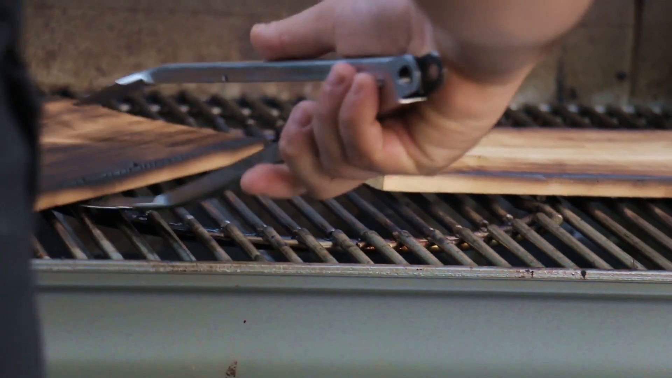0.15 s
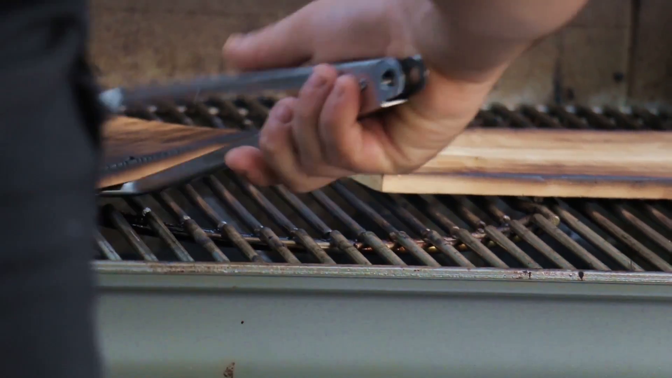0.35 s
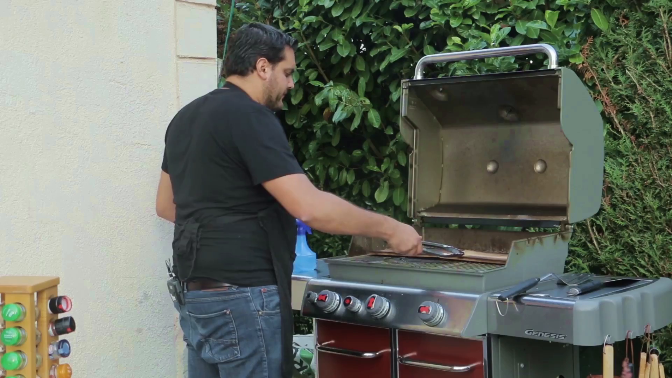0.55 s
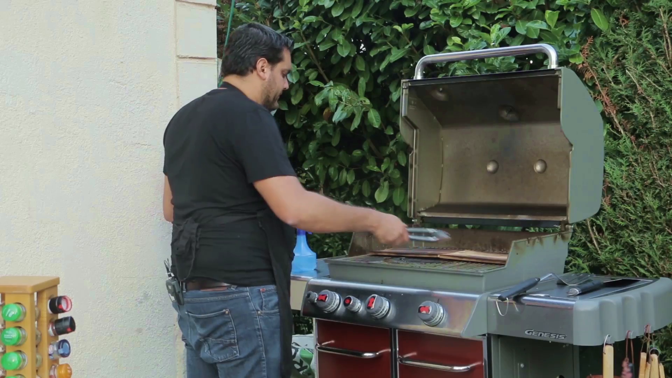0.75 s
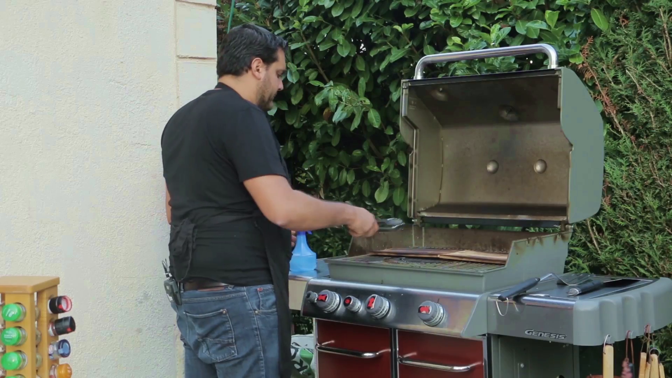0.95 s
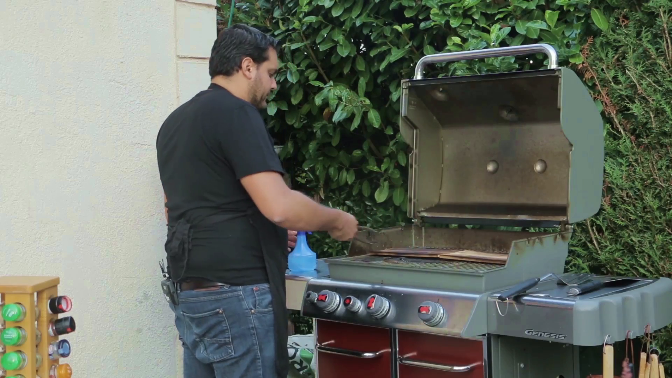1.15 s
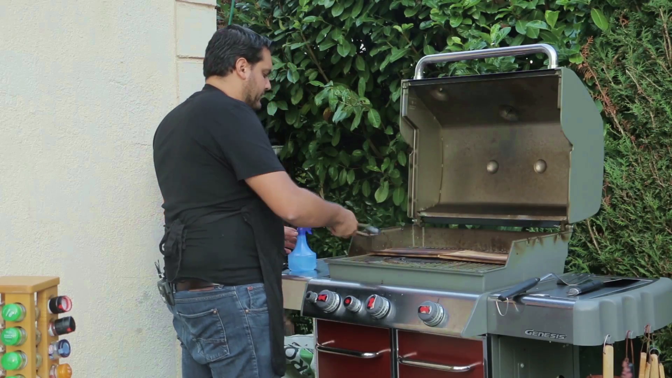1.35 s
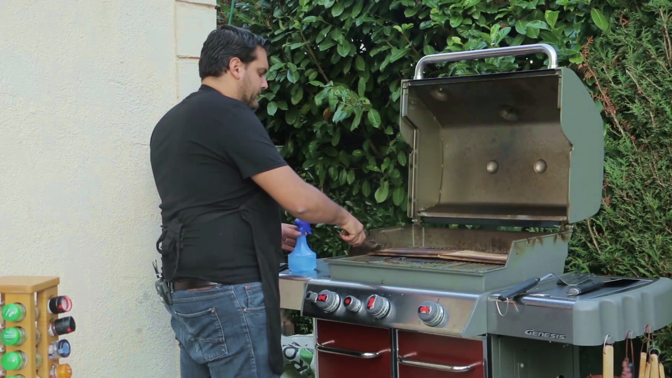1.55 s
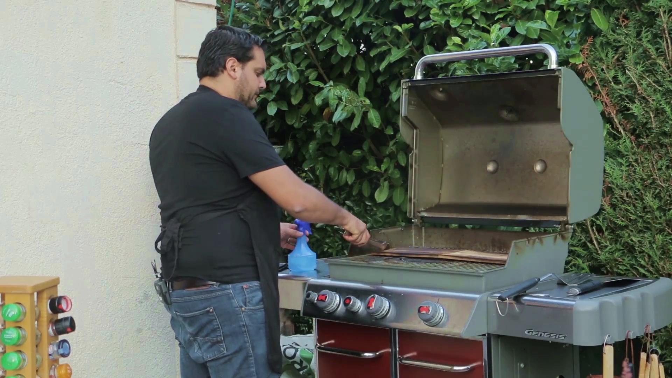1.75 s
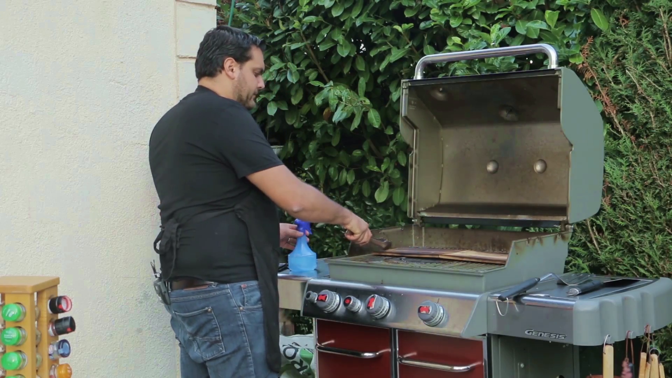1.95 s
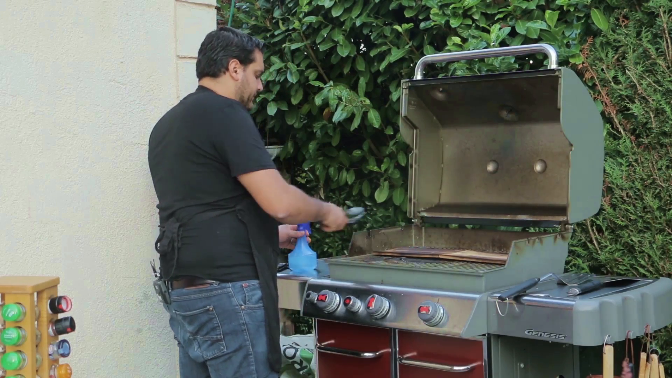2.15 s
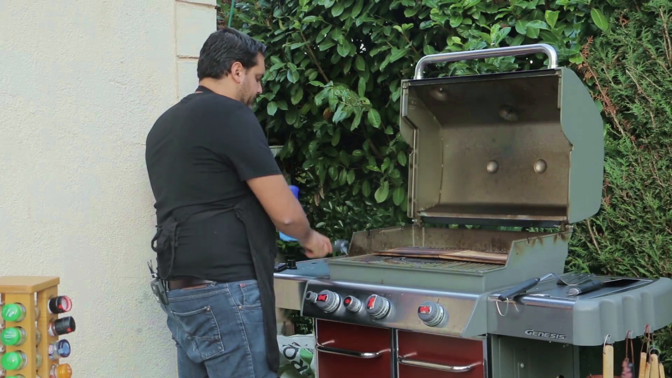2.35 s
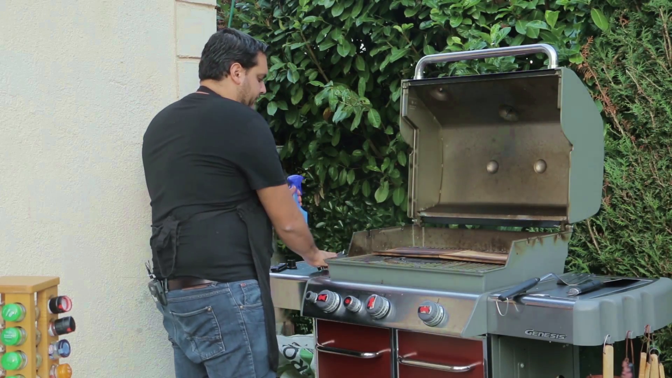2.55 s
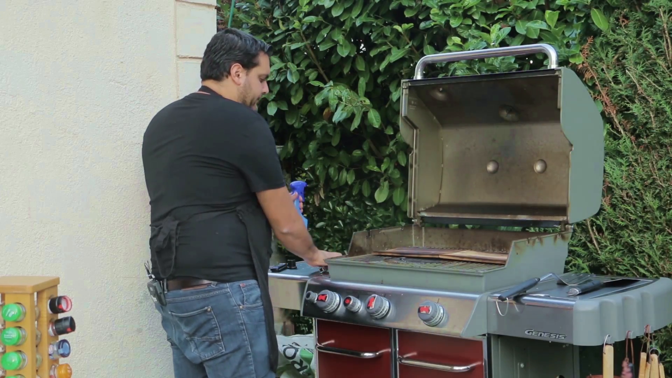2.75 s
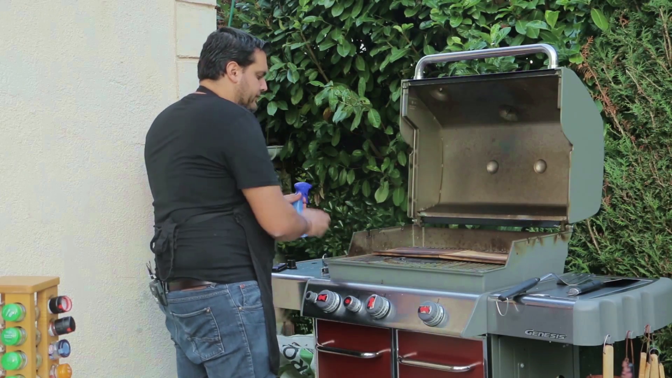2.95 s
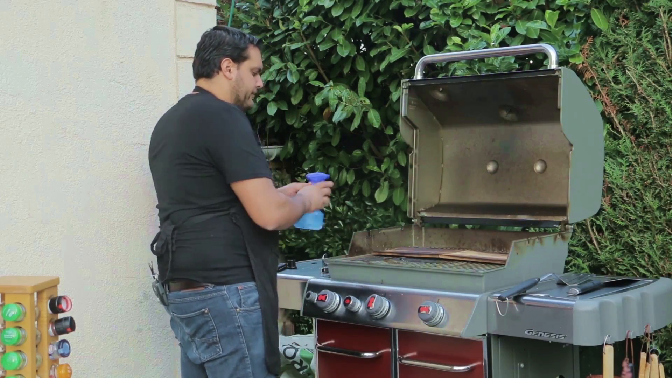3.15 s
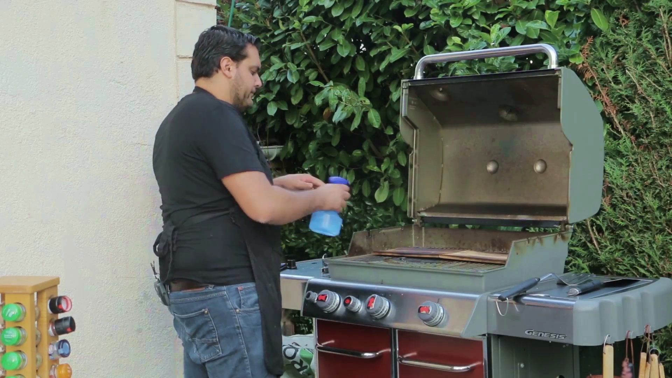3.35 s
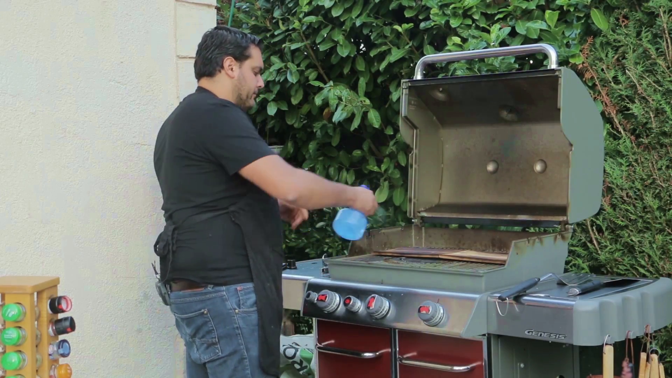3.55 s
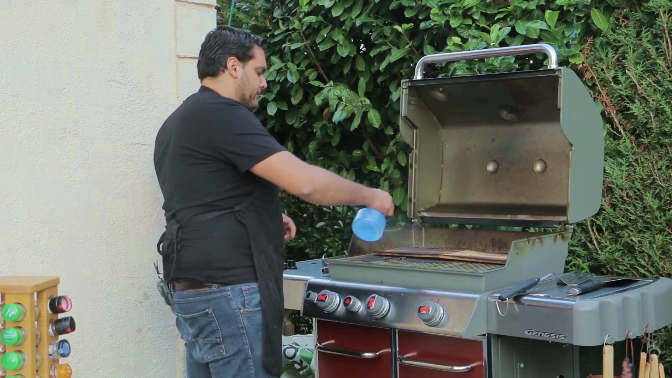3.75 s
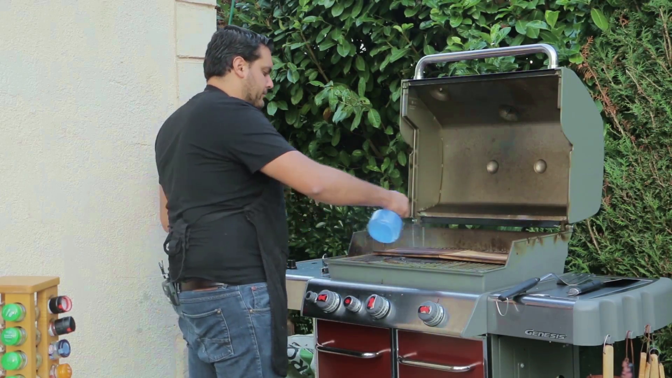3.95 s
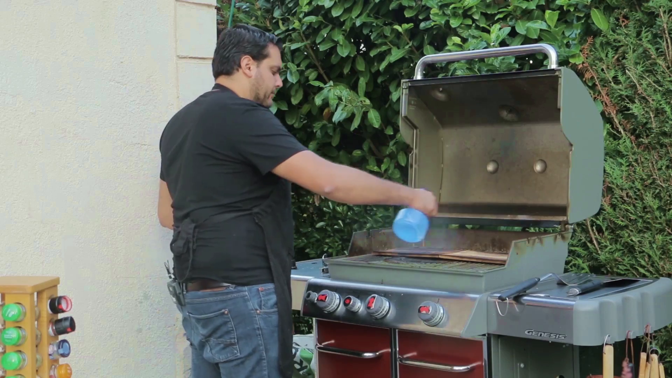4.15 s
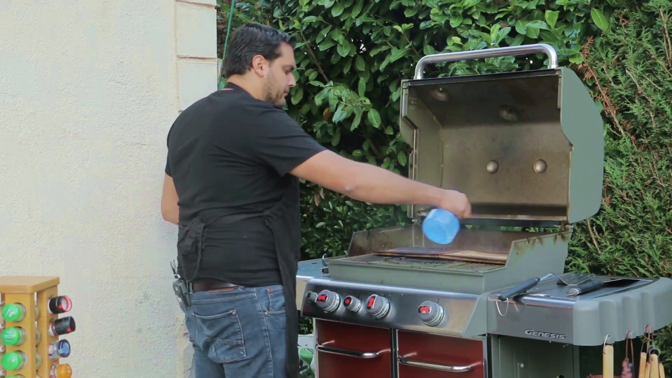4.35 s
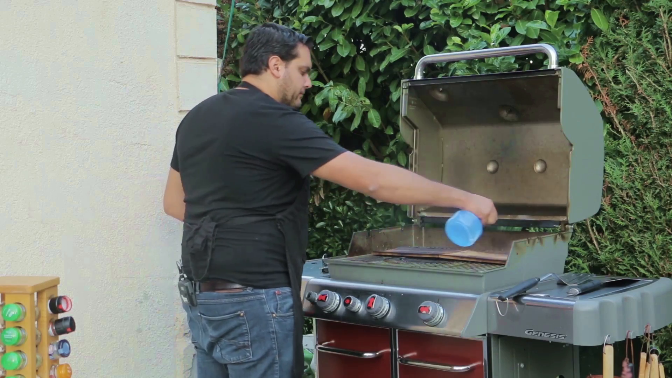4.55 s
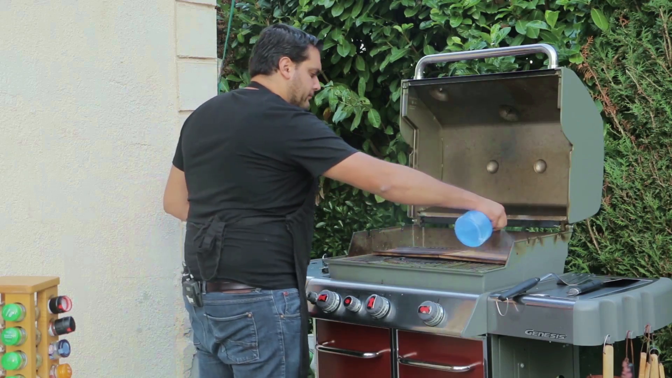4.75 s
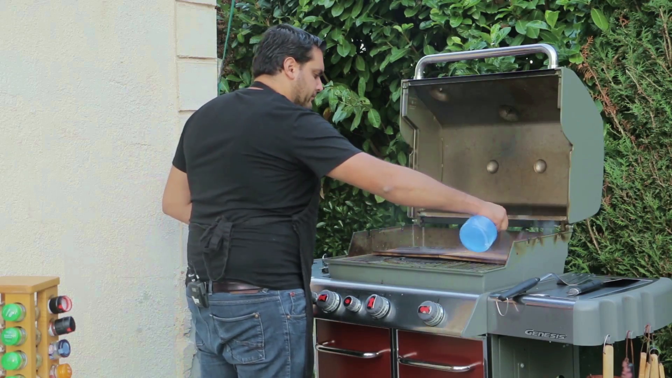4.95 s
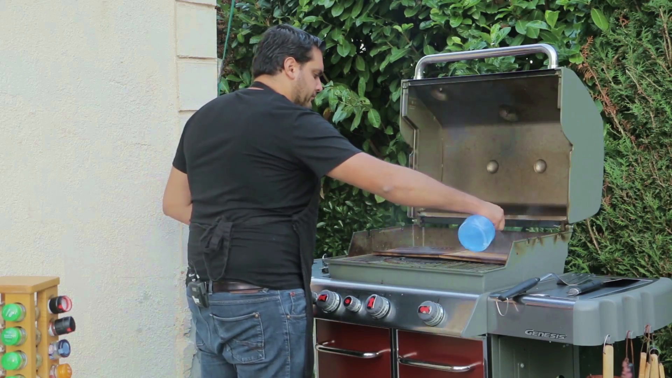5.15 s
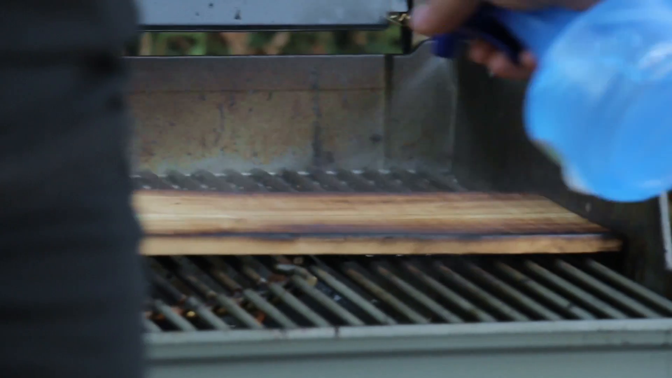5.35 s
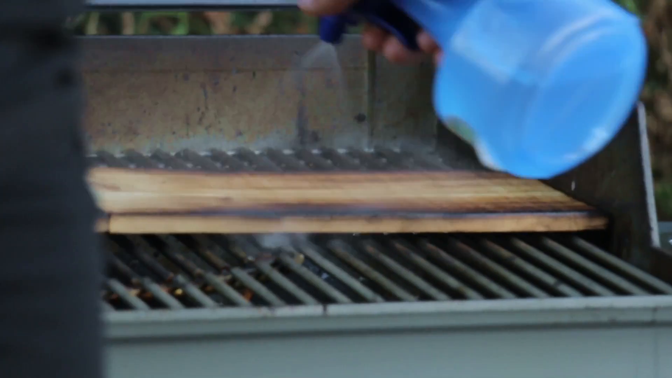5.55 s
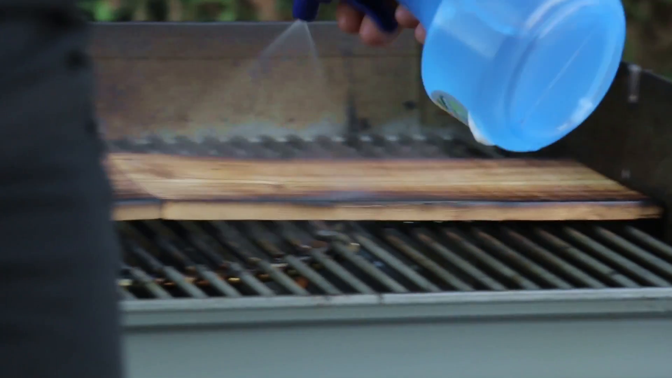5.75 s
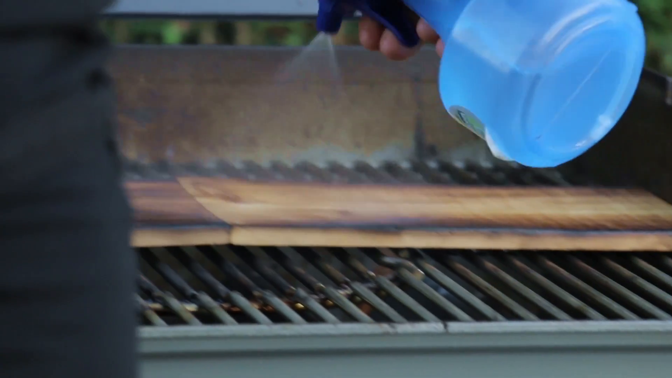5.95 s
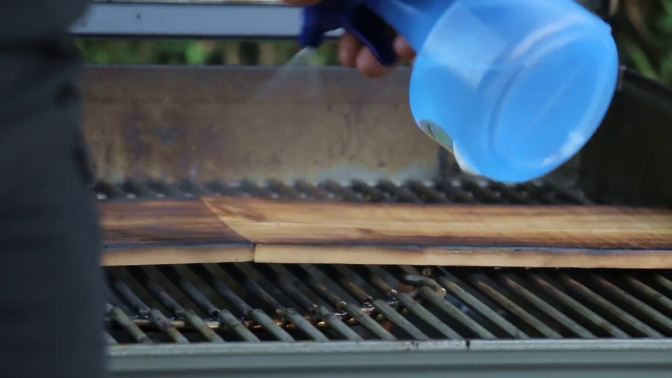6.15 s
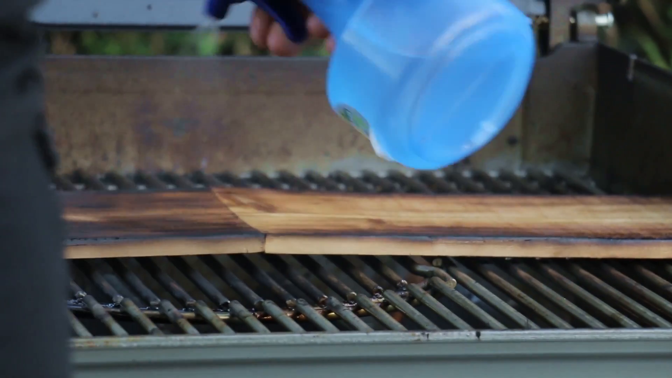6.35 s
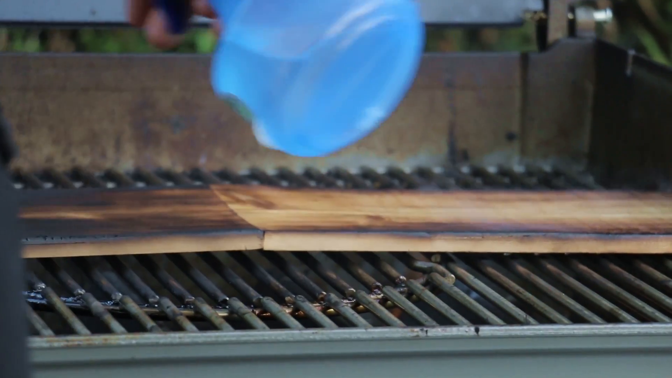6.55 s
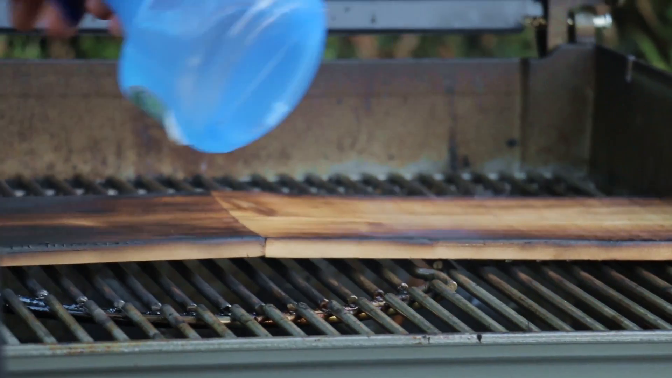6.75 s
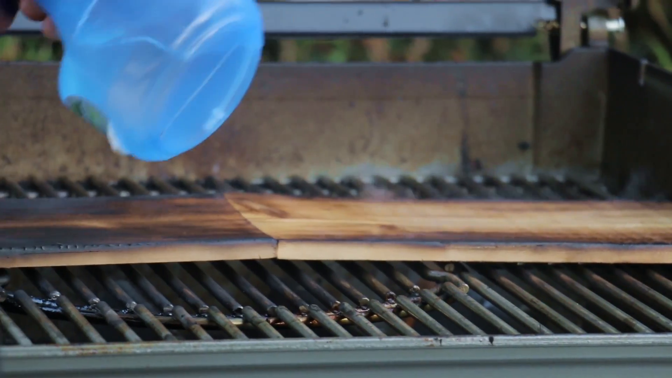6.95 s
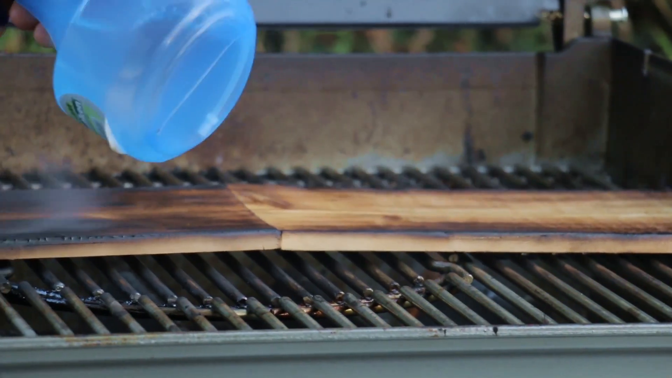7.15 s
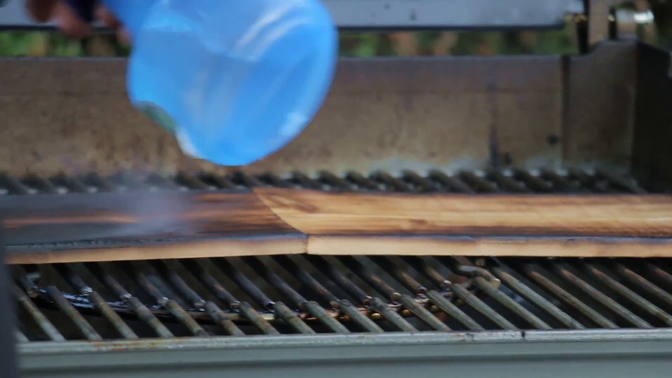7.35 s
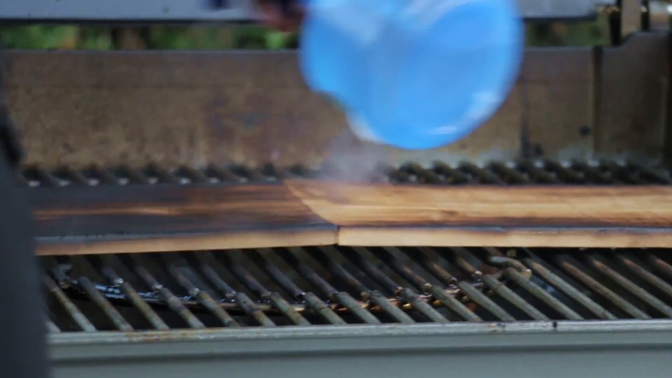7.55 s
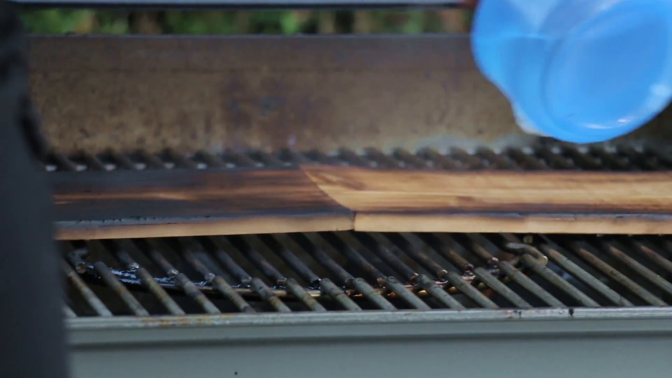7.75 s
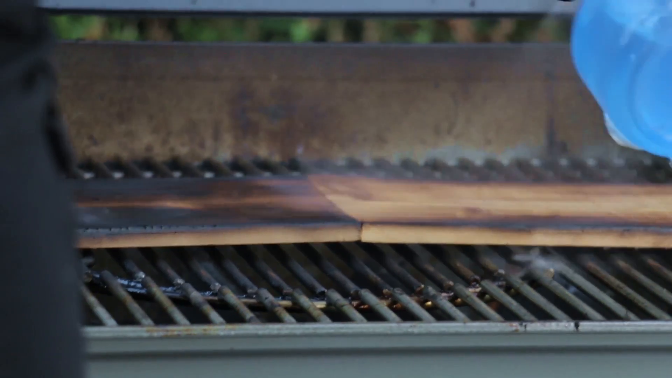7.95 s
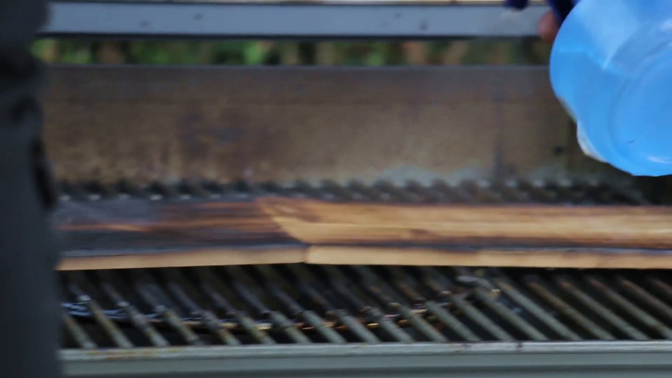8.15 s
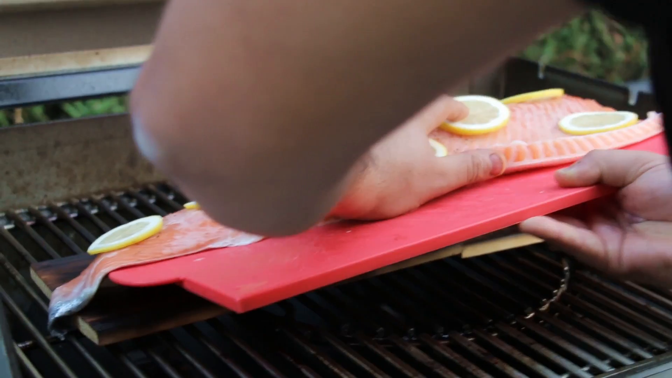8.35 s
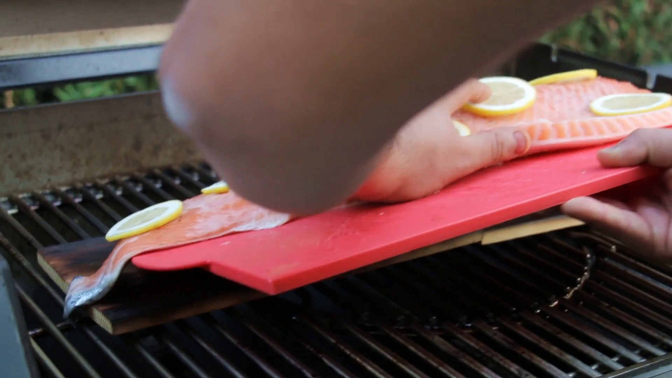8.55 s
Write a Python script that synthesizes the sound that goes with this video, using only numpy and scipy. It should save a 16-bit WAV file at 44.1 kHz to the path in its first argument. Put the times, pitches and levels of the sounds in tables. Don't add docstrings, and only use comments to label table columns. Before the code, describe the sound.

Close to a garden grill, wooden planks and metal tongs thump, scrape and rattle on loose bars, with a brief hinge squeal and a tong clap. Heavier clanks boom through the firebox. After small clicks, a trigger bottle squirts again and again, its pump snapping and juddering while water hisses and sizzles on hot wood. Faint burner and leafy air lie beneath; the sound fades out.

```python
import sys
import numpy as np
from scipy import signal
from scipy.fft import rfft, irfft, next_fast_len
from scipy.io import wavfile
from scipy.ndimage import uniform_filter1d, map_coordinates

SR = 44100
rng = np.random.default_rng(int(sys.argv[2]) if len(sys.argv) > 2 else 0)


def materialize(psi):
    bounded = np.clip(np.atleast_2d(psi).T, -1, 1)
    quanta = np.round(bounded * 32767).astype(np.int16)
    wavfile.write(sys.argv[1], SR, quanta)


def volts(x):
    e = np.asarray(x, float) / 20
    return 10 ** e


N = 379319
T = np.arange(N) / SR
CUT_S = 8.587


def unit(x):
    return x / np.sqrt(np.mean(x ** 2) + 1e-20)


def curves(rows):
    s, *cols = np.transpose(rows)
    return [np.interp(T, s, c, left=-150, right=-150) for c in cols]


def wobble(rate_hz):
    knots = rng.standard_normal(int(N * rate_hz / SR) + 4)
    return map_coordinates(knots, [T * rate_hz])


def filtered(x, response):
    m = next_fast_len(N + SR // 2)
    return irfft(rfft(x, m) * response(np.fft.rfftfreq(m, 1 / SR)), m)[:N]


def colour(points):
    f, db = np.transpose(points)
    return lambda hz: volts(np.interp(np.log(hz + 1), np.log(f), db, left=-120, right=-120))


def resonances(peaks):
    def response(f):
        total = 0
        for k, (hz, width_hz, db) in enumerate(peaks):
            damping = 1j * f * width_hz
            total = total + (-1) ** k * volts(db) * damping / (hz * hz - f * f + damping)
        return total
    return response


def noise(response, grain_db=0., rate_hz=600):
    grain = volts(grain_db * wobble(rate_hz))
    return unit(filtered(rng.standard_normal(N) * grain, response))


def streaked(response, streak_db):
    z = signal.stft(rng.standard_normal(N), nperseg=1024)[2]
    field = uniform_filter1d(rng.standard_normal(z.shape), size=14, axis=1)
    patchy = signal.istft(z * volts(streak_db * unit(field)), nperseg=1024)[1][:N]
    return unit(filtered(patchy, response))


def fading(s, db, t60, rise):
    t = np.maximum(T - s, 0)
    return volts(db - 60 * t / t60) * (1 - np.exp(-t / rise))


def ringing(modes, s, db, keep, loose, rise=.001):
    t = T[:SR]
    out = np.zeros(N + SR)
    ring = np.zeros(SR)
    for hz, level_db, t60_s in modes:
        strength, detune, *knots = rng.standard_normal(152)
        waver = 1 + loose * np.interp(t, np.arange(150) / 150, knots)
        decay = volts(db + level_db + 2.4 * strength - 60 * t / (keep * t60_s))
        ring += decay * waver * np.sin(2 * np.pi * hz * (1 + .002 * detune) * t)
    out[round(s * SR):][:SR] = ring * (1 - np.exp(-t / rise))
    return out[:N]


def garden():
    # start_s, level_db
    bed = [(0, -46.5), (1, -59.5), (1.8, -57.5), (3.4, -55.5), (5.5, -59), (7.9, -57.5), (8.61, -56)]
    # freq_hz, density_db
    air = [(15, -59), (25, -6.5), (130, 0), (330, -0.5), (560, -2), (1600, -16), (8140, -40),
           (16000, -34.5)]
    after_db = -56
    db = np.where(T > CUT_S, after_db, curves(bed)[0])
    gusts_db = 1.4 * wobble(9)
    return volts(db + 3.0 + gusts_db) * noise(colour(air))


def drag():
    # hardest_push_s, swell_s, release_s, rasp_db, rustle_db; swell, release span 20 dB
    slides = [(0.0, .1, 0.53, -46.5, -54), (.3, 0.42, 0.064, -51, -43), (.82, 0.52, 0.31, -61, -72),
              (1.15, .3, .5, -73, -80), (1.47, .4, 0.62, -65, -66), (1.77, .55, .4, -68, -82),
              (2.26, 0.39, 0.47, -61.5, -57), (2.86, 0.076, 0.2, -43.5, -45), (2.94, 0.11, .04, -35, -35.5),
              (2.99, .1, 0.088, -33.5, -55), (3.37, 0.22, 1, -64.5, -63.5), (3.72, .3, .03, -57, -52)]
    rasp_power = np.full(N, volts(-81.5) ** 2)
    rustle_power = np.full(N, volts(-73.5) ** 2)
    for s, swell_s, release_s, rasp_db, rustle_db in slides:
        push_db = -20 * np.maximum((s - T) / swell_s, (T - s) / release_s)
        rasp_power += volts(rasp_db + push_db) ** 2
        rustle_power += volts(rustle_db + push_db) ** 2
    rasp_shape = colour([(900, -14), (2000, -2.5), (5000, -4.5), (8500, -10.5), (10000, -31.0)])
    rustle_shape = colour([(7000, -36), (9000, -0.5), (12000, 0.5), (15800, -7)])
    rasp = np.sqrt(rasp_power) * volts(-2.0) * noise(rasp_shape, 1.8, 250)
    return rasp + np.sqrt(rustle_power) * volts(-6.0) * noise(rustle_shape, 3.6, 270)


def brushes():
    # start_s, length_s, level_db, low_hz, high_hz
    strokes = [(.795, .04, -56, 4000, 6500), (0.998, .032, -58.5, 1200, 3350), (1.0, 0.15, -69, 5300, 6600),
               (1.263, .1, -65, 3300, 3900), (1.33, .14, -71, 3500, 4800), (3.4, 0.099, -67, 4300, 5600),
               (0.838, 0.08, -65, 4200, 6900), (1.125, .07, -74, 3100, 3500),
               (1.19, 0.0071, -64, 500, 2000), (1.69, .025, -45, 4300, 7900), (2.865, .06, -45, 4500, 7600),
               (3.265, .045, -60, 3000, 15000), (3.367, .035, -58.5, 3000, 6500),
               (3.617, .035, -47.5, 2500, 15000)]
    out = np.zeros(N)
    for s, length_s, db, low_hz, high_hz in strokes:
        u = np.clip((T - s) / length_s, 0, 1)
        edges = np.clip(np.minimum(8 * u, 4 * (1 - u)), 0, 1)
        band = colour([(0.86 * low_hz, -30), (low_hz, 0), (0.98 * high_hz, 0)])
        out += volts(db - 6.2 * u) * edges * noise(band, 2.2, 300)
    return out


def smear(pitch_hz, rate_hz):
    strength = (0.95 + wobble(rate_hz)) * volts(2.0 * wobble(30))
    return strength * np.sin(2 * np.pi * np.cumsum(pitch_hz) / SR)


def hinge():
    # start_s, pitch_hz, level_db
    squeak = [(1.255, 3590, -74), (1.278, 3630, -67), (1.288, 4000, -63), (1.36, 3970, -65),
              (1.42, 4200, -61), (1.5, 4130, -65), (1.58, 4290, -63), (1.625, 4200, -74)]
    # start_s, length_s, pitch_hz, level_db, glide_hz_per_s
    chirps = [(1.0, .1, 5500, -69, 0), (1.46, .17, 11800, -71, 0), (.56, .08, 10600, -73, 0),
              (3.125, .04, 14500, -72, 25000), (3.175, .03, 15200, -70, -50000),
              (3.2, .025, 12800, -68, -50000)]
    hz = np.interp(T, *np.transpose(squeak)[:2])
    main = smear(hz * (1 + 0.005 * wobble(35)), 250)
    lower = 0.85 * np.clip((1.45 - T) / 0.12, 0, 1) * smear(0.41 * hz + 1950, 450)
    rough = 0.57 * smear(0.97 * hz, 1500)
    out = volts(curves(squeak)[1]) * (main + lower + rough)
    for s, length_s, chirp_hz, db, glide in chirps:
        swell = np.sin(np.pi * np.clip((T - s) / length_s, 0, 1))
        pitch_hz = chirp_hz + glide * np.clip(T - s, 0, length_s)
        out += volts(db) * swell * smear(pitch_hz * (1 + .006 * wobble(44)), 400)
    return out


def ticks():
    # start_s, peak_db, pitch_hz, t60_s
    contacts = [(1.2344, -54, 4860, 0.065), (1.4894, -50, 4020, 0.06), (1.5195, -33, 1810, 0.053),
                (2.319, -34.5, 11500, 0.1), (2.529, -46, 1500, 0.031), (3.545, -44, 7000, 0.04),
                (3.3714, -51, 3500, 0.12), (3.4216, -45, 1630, 0.044), (3.454, -39, 2000, 0.02),
                (3.5877, -38, 5400, 0.038), (3.6244, -31.5, 3270, 0.18), (3.6444, -39, 6680, 0.075),
                (3.6874, -27.5, 3358, 0.075), (8.2894, -34, 2080, 0.066), (8.3976, -31, 10900, 0.06),
                (8.4684, -38, 2020, 0.06)]
    wide = streaked(colour([(900, 3), (2000, 0.5), (8000, -3.0), (15500, -3.5)]), 2.2)
    flutter = 0.99 * wobble(450)
    out = np.zeros(N)
    for s, db, hz, t60 in contacts:
        out += fading(s, db - 11.0, t60, 0.00055) * wide
        out += fading(s, db - 5, 0.35 * t60, .0004) * flutter * np.sin(2 * np.pi * hz * T)
    return out


def notes():
    # start_s, peak_db, pitch_hz, t60_s
    tones = [(1.001, -36, 210, 0.05), (1.625, -28.5, 3390, 0.037), (1.628, -29, 2000, .08),
             (1.8, -37, 1650, 0.056), (1.4, -51, 6800, 0.065), (2.35, -30, 4600, 0.099),
             (2.364, -36, 4000, .05), (2.352, -35, 5260, 0.1), (2.365, -34.5, 2080, 0.07),
             (0.082, -43, 7000, 0.063), (0.094, -41, 11000, .08), (3.861, -31, 2090, 0.046),
             (4.72, -35, 2220, 0.037), (4.91, -37, 1980, 0.02), (5.5, -44, 3470, 0.092),
             (6.346, -41, 1930, 0.039), (6.631, -46, 1300, 0.055)]
    out = np.zeros(N)
    for s, db, hz, t60 in tones:
        t = T - s
        out += fading(s, db, t60, 0.00032) * np.sin(2 * np.pi * hz * t * (1 + 0.13 * t))
    return (1 + .5 * wobble(350)) * out


def blows():
    # start_s, peak_db, thud_db, brightness_db, t60_s
    sudden = [
        (0.4554, -24, -8, -16, 0.38),
        (0.7567, -31.5, 1, -41, 0.32),
        (2.3491, -25.5, -11.5, -7.5, 0.071),
        (2.3627, -31, -25, -2.5, 0.15),
    ]
    blunt = [(0.0034, -39, 7, -32, 0.32), (0.0972, -30, -4, -9, 0.28), (0.2024, -19.5, -9, -16.5, 0.35),
             (0.5104, -33, -2, -18.5, 0.66), (0.7955, -38, 2.5, -22, 0.68), (1.6924, -44, 7, -4, 0.55),
             (1.0006, -47, -4, -25, 0.097), (2.594, -15, -6, -18, 0.48), (2.7212, -17.5, -4, -14.5, 0.58),
             (2.9334, -12, -7, -13.5, 0.41), (2.9594, -22.5, -10.5, -10.5, 0.78)]
    glancing = [(0.044, -36.5, -13, -10.5, 1.0), (0.2897, -36.5, -3.5, -12, 0.85),
                (.222, -29, -1, -29, 0.27), (1.624, -29, -4, -9, 0.32), (3.0238, -19, -16.5, -16, 0.37),
                (2.93, -18.5, 2.5, -20, 0.48)]
    # freq_hz, width_hz, level_db
    plank = [(197, 85, -5), (288, 92, -4), (427, 69, 1), (510, 68, 3), (655, 32, 3.5), (743, 26, -1.5),
             (881, 50, -3), (1090, 19, -5), (1280, 35, -23)]
    firebox = [(121, 20, -13), (220.5, 25, -4), (256, 25, -1), (308, 30, -3.5), (375, 18, -1),
               (411, 19, -3), (464, 27, -2), (559.5, 22, 1), (655, 38, -4), (739, 19, 1), (825, 26, -4),
               (962, 36, -8.5), (1073, 25, -8), (1258, 40, -12)]
    shimmer = [(5230, 200, -12), (6500, 350, -2), (7360, 500, 3), (7900, 300, -2)]
    # freq_hz, level_db, t60_s
    tongs = [(1495, -15, 2.7), (2050, 7, 0.22), (2310, -12.5, 0.97), (2920, -20, 1.4), (3940, -20.5, 0.78),
             (4950, -19, 0.4), (5190, -22, 1), (6700, 5, 0.075), (6500, -28, 1.3), (7280, -19, 0.53),
             (2780, -20.5, 1.4), (7913, -21, .4), (11250, -17, .4), (12250, -18, .35)]
    grate = [(1430, -7.5, 0.29), (1570, -7, 0.11), (2100, -16, 0.22), (2720, -15, 0.22), (3340, -4, 0.55),
             (3840, -2, 0.35), (4500, -15.5, 1.1), (5200, -3.5, 0.18), (6150, -15, 0.28), (7542, -22, 0.38),
             (8300, -31.5, 0.3), (8382, -48, 0.32)]
    loaded = [(514, -5, 0.52), (618, -7, 0.68), (850, -10, 0.64), (1196, -6.5, 1.14), (1785, -6.5, 0.59),
              (2035, -6, 0.4), (2400, -17, 0.33), (2760, -12, 0.48), (3210, -15, 0.52), (3515, -15, 0.37),
              (3830, -17, 0.36), (4540, -25, 1.4), (5070, -11, 0.11), (6330, -16, 0.17)]
    shifted = [(476, -2, 0.58), (570, 1, 0.53), (864, -5, 1), (1035, -9, 0.99), (1774, 3, 0.27),
               (2250, -15, .31), (2760, -17, .4), (3042, -18, .62), (3521, -25, 1.2), (3962, -21, .24),
               (4339, -14, 0.32), (5120, -23, .46), (5297, -22, .31), (5652, -34, 1.2)]
    box = [(251.4, -8, 0.34), (490, -2.5, 0.3), (557, -1.5, 0.43), (728, -5.5, 0.3), (1351, -15, 0.5),
           (1500, -10.5, 0.26), (1857, -16, 0.34), (1992, -16, 0.33), (2200, -28, 0.91),
           (2277, -21.5, 0.42), (2697, -23, 0.53), (2880, -19, 0.47), (3300, -15.5, 0.46),
           (3680, -25.5, 0.31)]
    # freq_hz, density_db
    crash_shape = [(700, -19), (1100, 1), (1700, -0.5), (2400, -6.5), (3500, -27)]
    clang_shape = [(1800, -37), (2600, 0), (4500, -4.5), (6000, -10), (8000, -17.5)]
    sheen_shape = [(4000, -9.5), (6000, -6), (10000, -5), (15500, -9)]

    thud, crash, clang, sheen, ring, knock = np.zeros((6, N))
    kinds = [(sudden, 0.001), (blunt, 0.0031), (glancing, 0.0086)]
    contacts = [(*row, rise) for rows, rise in kinds for row in rows]
    for s, db, thud_db, bright_db, t60, rise in contacts:
        thud += fading(s, db + thud_db - 1.5, 1.24 * t60, 1.9 * rise) ** 2
        crash += fading(s, db - 11, 0.93 * t60, rise) ** 2
        clang += fading(s, db + 0.53 * bright_db - 6, 0.71 * t60, rise) ** 2
        clang += fading(s, db + 0.75 * bright_db - 6.5, 0.018, .0004) ** 2
        sheen += fading(s, db + bright_db - 3.5, 0.48 * t60, rise) ** 2
        sheen += fading(s, db + bright_db + 1.5, 0.084, .0003) ** 2
        knock[round(s * SR)] = volts(db + thud_db + 45.5 - 3500 * rise)
        if 1.5 < s < 1.75:
            ring += ringing(tongs, s, db - 10.5, keep=0.97, loose=.45)
        elif not 2 < s < 2.5:
            ring += ringing(grate, s, db + 0.48 * bright_db - 18.0, keep=0.52, loose=.6)
        if s < .9:
            bars = loaded if s < .7 else shifted
            ring += ringing(bars, s, db - 13.5, keep=0.68, loose=0.55, rise=0.004)
        if s > 2.5:
            ring += ringing(box, s, db + thud_db - 3.5, keep=0.96, loose=0.58, rise=.012)

    lifted = noise(resonances(plank), 1.1, 90)
    dropped = noise(resonances(firebox), 0.87, 90)
    boom = np.sqrt(thud) * np.where(T < 2.2, lifted, dropped)
    wood = filtered(knock, resonances([(538, 140, -0.5), (1950, 330, -10.5)]))
    rattle = np.zeros(N)
    for power, shape in [(crash, crash_shape), (clang, clang_shape), (sheen, sheen_shape)]:
        rattle += np.sqrt(power) * streaked(colour(shape), 4.8)
    tail_gate = np.where(T < 1.62, volts(-2500 * np.clip(T - 1.03, 0, .01)), 1)
    tong_shimmer = fading(1.625, -55, 0.64, .004) * noise(resonances(shimmer), 2.5, 60)
    return tail_gate * (boom + wood + rattle + ring) + tong_shimmer


def bottle(x):
    # freq_hz, width_hz, level_db
    upright = [(386, 210, -3.5), (818, 110, 5)]
    tipped = [(348, 132, 3), (827, 83, 3.5)]
    tipped_s = 6.55
    return np.where(T < tipped_s, filtered(x, resonances(upright)), filtered(x, resonances(tipped)))


def ramp(x):
    return np.sin(np.pi / 2 * np.clip(x, 0, 1)) ** 2


def squeeze(s, length_s):
    attack_s, release_s, build_db = 0.018, 0.049, 6
    drain_db, drain_t60_s = -9, 0.34
    opening = ramp((T - s) / attack_s) * volts(build_db * np.clip((T - s) / length_s - .7, -1, 0))
    hold = ramp((s + length_s - T) / release_s)
    drain = volts(drain_db - 60 * np.maximum(T - s - length_s, 0) / drain_t60_s)
    return opening ** 2 * (hold ** 2 + drain ** 2)


def spray():
    # start_s, squeeze_s, jet_db, pump_db
    pulls = [(3.74, 0.13, -56, -70), (3.89, 0.16, -40, -46), (4.115, 0.049, -38.5, -45),
             (4.3, 0.061, -40, -45), (4.53, 0.058, -36.5, -49), (4.74, 0.14, -43, -55),
             (4.946, 0.14, -36.5, -48.5), (5.155, 0.089, -39, -69), (5.35, 0.057, -41.5, -60),
             (5.555, 0.054, -41.5, -46), (5.77, 0.088, -41, -57), (5.977, 0.063, -38, -46),
             (6.205, 0.057, -38.5, -50), (6.412, 0.07, -39, -46), (6.655, .17, -45.5, -50),
             (6.87, 0.17, -40, -51), (7.09, 0.17, -40.5, -48), (7.3, .16, -39, -44.5),
             (7.51, 0.19, -40, -46), (7.745, 0.08, -41, -45.5)]
    # start_s, level_db
    boiling = [(3.71, -53), (3.75, -39.5), (3.82, -37), (3.88, -39), (3.98, -35.5), (4.37, -36.5),
               (4.44, -35), (4.56, -39), (4.69, -36.5), (4.95, -42), (5.67, -42), (5.7, -41), (6.41, -46),
               (6.7, -47), (7.0, -43), (7.9, -41.5), (8.25, -50), (8.61, -52.5)]
    # start_s, level_db
    spits = [(3.62, -41.5), (3.69, -38)]
    # freq_hz, density_db
    steam_shape = [(700, -27), (1500, -23.5), (3000, -11), (8500, -5.5), (12400, 1.5), (15200, -1),
                   (15800, -13), (16000, -40)]
    jet_shape = [(530, -5), (900, -3.5), (1800, 0.5), (2860, -1), (4770, -1), (9000, -5.5), (11700, 1),
                 (19800, -120)]
    after_db, flash_db, soak_s, spit_t60_s = -66, -3, 0.05, 0.12

    boil_db = np.where(T > CUT_S, after_db, curves(boiling)[0])
    drip = volts(-50 + 1.21 * (boil_db + 41)) ** 2
    jet = drip.copy()
    pump = drip * volts(-11) ** 2
    flash = np.zeros(N)
    for s, length_s, jet_db, pump_db in pulls:
        stroke = squeeze(s, length_s)
        jet += stroke * volts(jet_db) ** 2
        pump += stroke * volts(pump_db) ** 2
        if 4.9 < s < 5.1:
            flash += volts(jet_db) ** 2 * 2 * stroke
        else:
            flash += volts(jet_db) ** 2 * np.roll(stroke, round(soak_s * SR))
    boil = volts(boil_db) ** 2 + volts(flash_db) ** 2 * flash
    for s, db in spits:
        boil += fading(s, db, spit_t60_s, .004) ** 2

    crackle = streaked(colour(steam_shape), 1.8) * volts(0.68 * wobble(2500))
    steam = np.sqrt(boil) * volts(0.47 + 0.79 * wobble(30)) * crackle
    rush = streaked(colour(jet_shape), 2.3) * volts(2.3 * wobble(900))
    hiss = np.sqrt(jet) * volts(0.4 + 1.5 * wobble(45)) * rush
    gurgle = unit(bottle(rng.standard_normal(N))) * volts(2.4 * wobble(80))
    return steam + hiss + np.sqrt(pump) * volts(-1.5) * gurgle


def slips():
    # start_s, peak_db, bottle_db
    jerks = [(4.1145, -28.5, -12), (4.3067, -34, -25), (4.7392, -26, -27), (4.9454, -32, -26),
             (5.154, -30.5, -26), (5.3496, -30, -26), (5.3608, -38, -17), (5.5562, -30, -22),
             (5.5724, -29.5, -22), (5.9858, -46, -17), (5.9938, -37, -7), (6.2092, -34, -17),
             (6.22, -40, -33), (7.5178, -34.5, -18), (7.5268, -32, -20), (7.549, -25, -25),
             (7.559, -28, -17), (7.964, -32.5, -15)]
    # start_s, peak_db, bottle_db
    trains = [(3.8826, -29, -19), (3.896, -23.5, -22), (3.9104, -23, -15), (3.929, -18.5, -14),
              (3.952, -15.5, -19), (3.976, -21, -15), (3.999, -24, -19), (4.5264, -24, -25),
              (4.5364, -25, -19), (5.7803, -23, -22), (5.7908, -24, -19), (5.806, -25, -23),
              (6.419, -32, -19), (6.426, -34, -22), (6.6556, -30, -21), (6.6662, -24, -19),
              (6.6818, -19.5, -22), (6.7029, -17, -19), (6.7293, -16, -16.5), (6.757, -23, -15),
              (6.781, -26, -20), (6.8064, -33, -21), (6.8736, -32, -19), (6.8828, -27, -21),
              (6.8942, -26, -22), (6.908, -18, -20), (6.9295, -17.5, -16), (6.9551, -20, -19),
              (6.9764, -23.5, -19), (6.993, -27, -19), (7.093, -29, -23), (7.1032, -26, -21),
              (7.1149, -19.5, -19), (7.136, -18, -17), (7.1607, -16, -22), (7.186, -17, -18),
              (7.209, -24, -26), (7.2274, -26.5, -17), (7.3086, -32, -17), (7.3178, -30, -19),
              (7.328, -28, -14), (7.3419, -22, -16), (7.357, -21, -21), (7.3734, -21.5, -21),
              (7.396, -22, -23), (7.418, -26.5, -19), (7.576, -38, -19), (7.5873, -21.5, -12.5),
              (7.6023, -20, -16), (7.6226, -21, -16), (7.6443, -27, -19), (7.7483, -31.5, -21),
              (7.7568, -33, -20), (7.7757, -24.5, -19), (7.7933, -28, -17)]
    emptying_s = 7.3
    snap, knock, puff = np.zeros((3, N))
    for s, db, bottle_db in list(jerks) + [(s, db - 2.5, b) for s, db, b in trains]:
        snap[round(s * SR)] = volts(db + 14.5)
        snap[round((s + .0085) * SR)] = volts(db + 10.5)
        knock[round(s * SR)] = volts(db + bottle_db + 37.0)
        puff += fading(s, db - 6.5, 0.028, .0004) ** 2
        puff += fading(s + 0.0071, db - 12, 0.037, 0.0013) ** 2
    full = resonances([(1370, 1540, -6.5), (2380, 1230, 2.0), (4200, 1500, 0),
                       (5570, 1100, 0.0), (9370, 3300, -9.0)])
    empty = resonances([(900, 440, -7), (1880, 780, 3), (3600, 1700, -0.5),
                        (5700, 1500, -2.5), (8300, 1500, -4)])
    wet = filtered(snap, full) + np.sqrt(puff) * streaked(full, 3.4)
    airy = filtered(snap, empty) + np.sqrt(puff) * streaked(empty, 3.4)
    return np.where(T < emptying_s, wet, airy) + bottle(knock)


def scene():
    handling = drag() + brushes() + hinge() + ticks() + notes() + blows()
    return np.tile(garden() + handling + spray() + slips(), (2, 1))


def low_pass(x):
    return signal.sosfilt(signal.butter(12, 16500, fs=SR, output="sos"), x)


def record(dry):
    fade_s, fade_power, bass_hz, top_hz = 0.53, 1.07, 50, 16450
    fade = np.where(T > CUT_S, 1, np.clip((CUT_S - T) / fade_s, 0, 1) ** fade_power)
    soft = dry[0] / (1 + np.abs(dry[0] / .55) ** 4) ** .25
    heard = filtered(soft * fade, lambda hz: (1j * hz / (bass_hz + 1j * hz)) ** 4 * (hz < top_hz))
    return low_pass(np.array([heard, heard]))


dry = scene()
out = record(dry)
materialize(out)
```